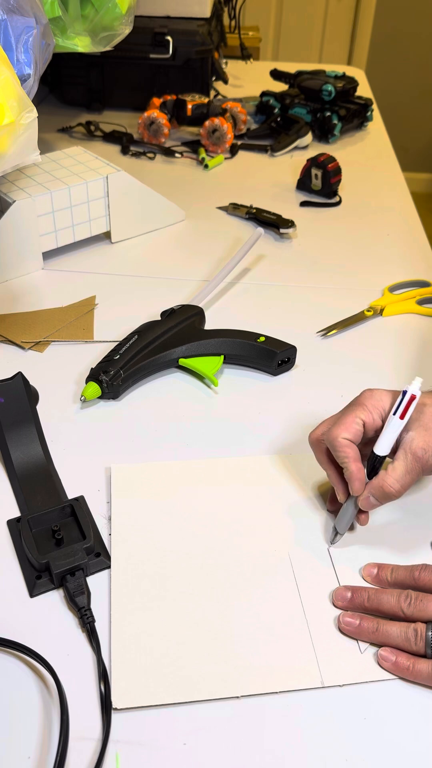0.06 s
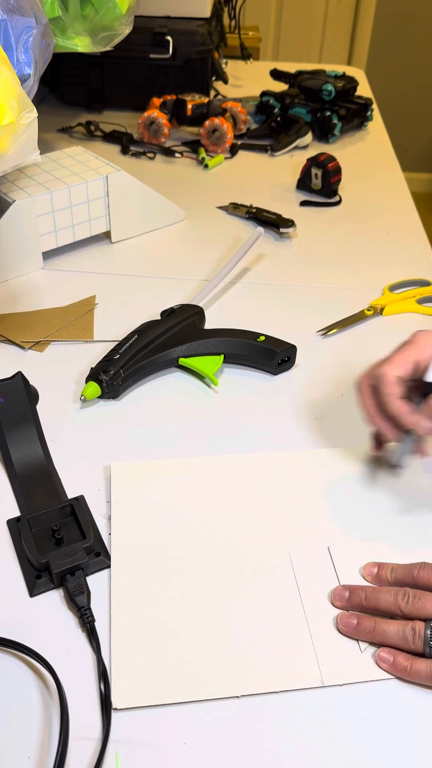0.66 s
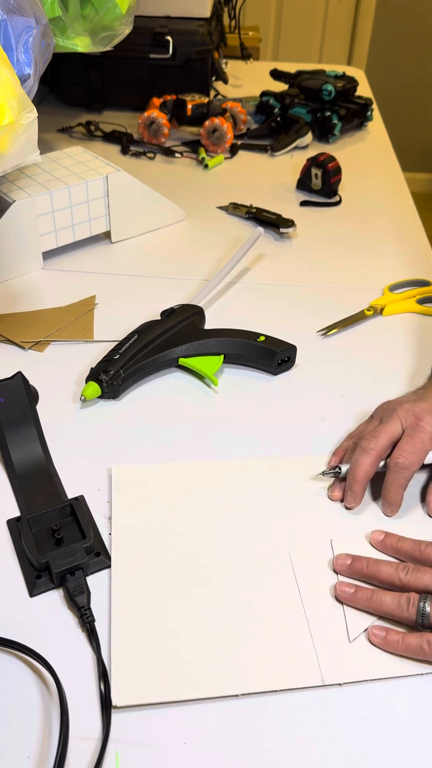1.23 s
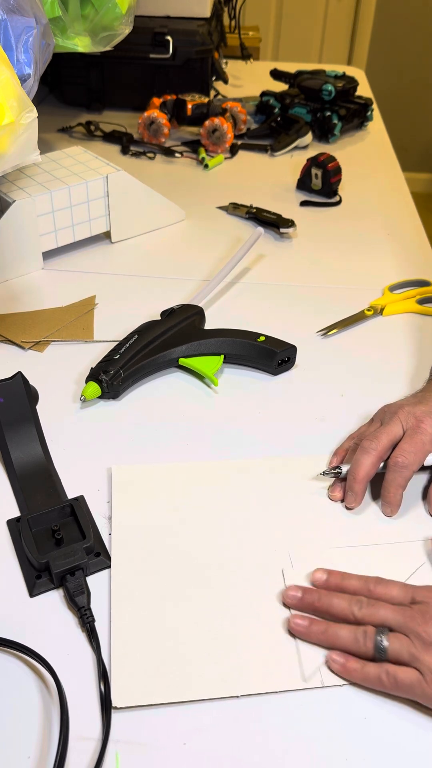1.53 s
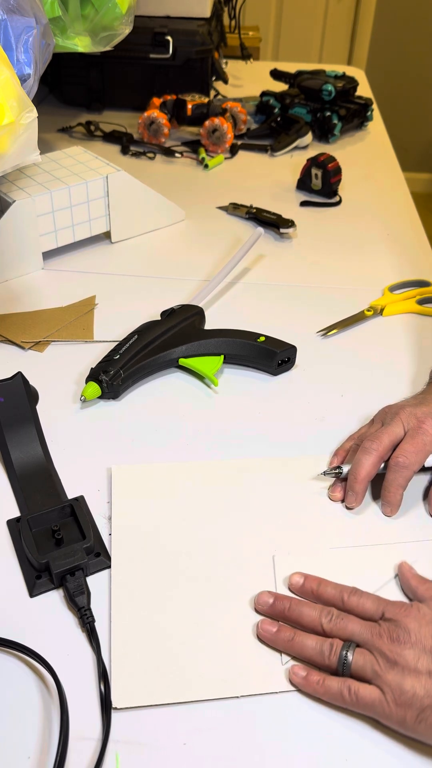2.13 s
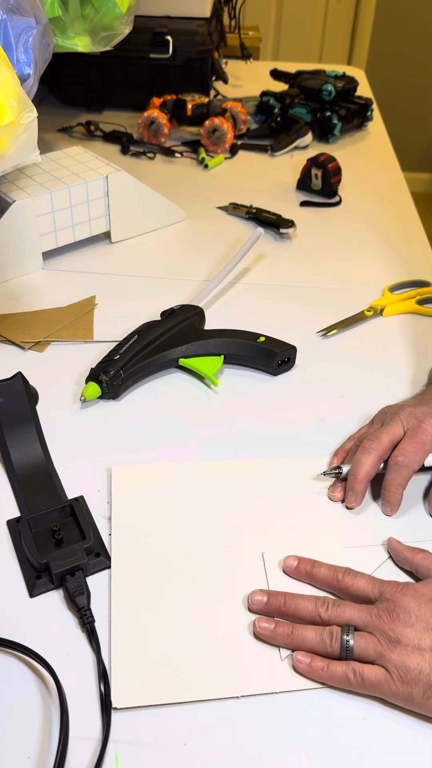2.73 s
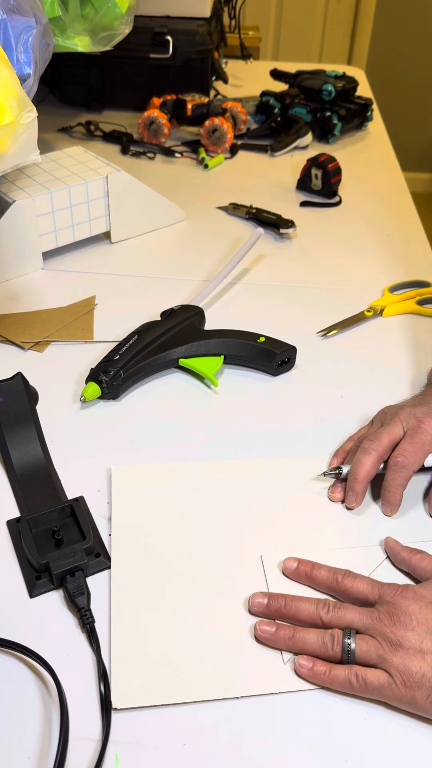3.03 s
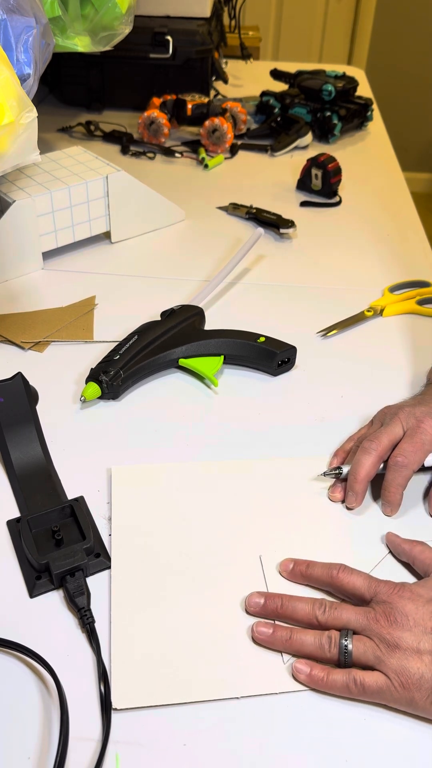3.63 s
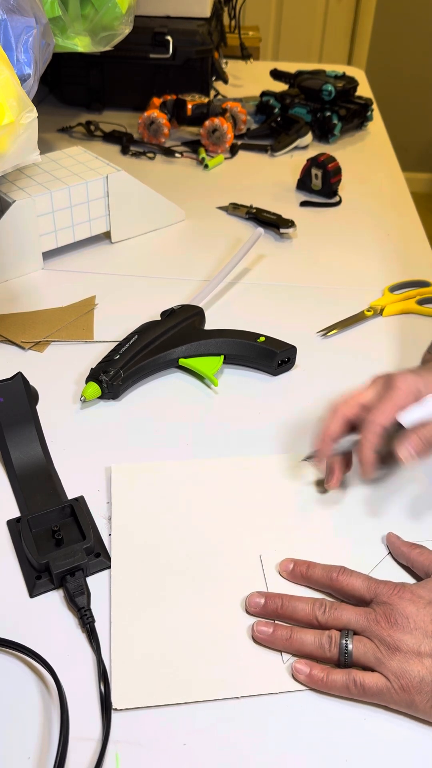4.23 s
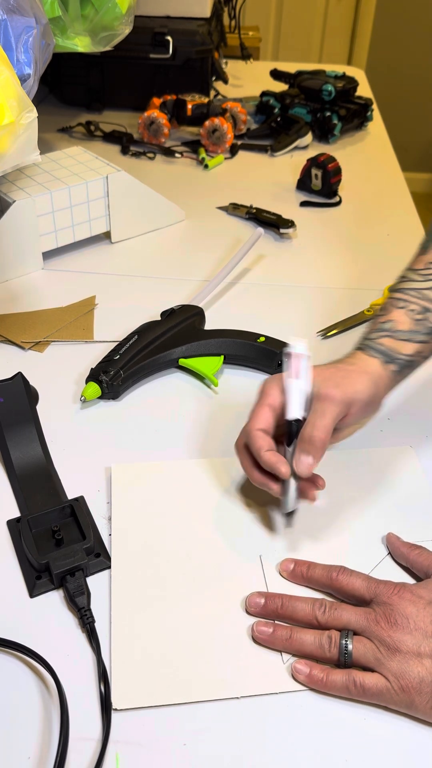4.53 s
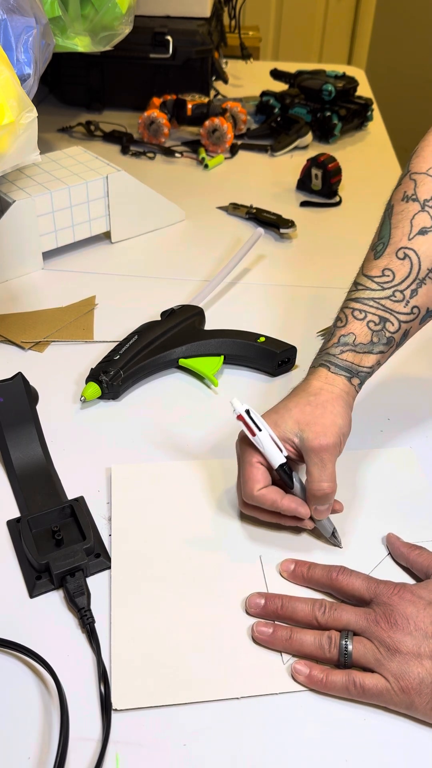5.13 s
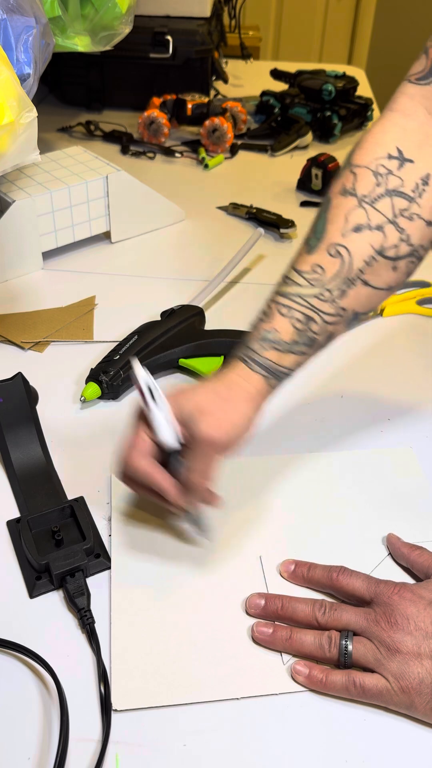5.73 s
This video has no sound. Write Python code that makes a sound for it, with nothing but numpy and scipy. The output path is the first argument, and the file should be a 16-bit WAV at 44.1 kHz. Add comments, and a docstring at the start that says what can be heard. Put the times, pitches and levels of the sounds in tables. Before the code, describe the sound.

A ballpoint pen scratches quickly across corrugated cardboard, making a low buzz that rises in pitch. The pen is set down with light clicks, and a hand slides and taps softly on the sheet. After a quieter stretch of small shifts, a second short, rising stroke ends in a sharp tick. The microphone is close, in a small room with a faint ventilation rumble.

```python
"""A ballpoint is drawn twice, fast, across corrugated cardboard on a table in a small room.
The ball scratches the paper and bumps over the flutes, so the board buzzes at a pitch that follows
the pen's speed. Between the strokes the pen is set down and a flat hand slides, taps and shifts on
the sheet. Ventilation rumbles faintly throughout; a phone hears it all through two close ports."""
import sys
import numpy as np
from scipy import signal
from scipy.fft import rfft, irfft
from scipy.io import wavfile

SR = 44100
rng = np.random.default_rng(int(sys.argv[2]) if len(sys.argv) > 2 else 0)


def master(y):
    """Save y as 16-bit WAV."""
    cut = np.clip(np.atleast_2d(y).T, -1, 1)
    pcm = np.round(cut * 32767)  # scale
    wavfile.write(sys.argv[1], SR, pcm.astype(np.int16))


N = 254452
T = np.arange(N) / SR
FFT_SIZE = 9 * 2 ** 15
FREQ = np.arange(FFT_SIZE // 2 + 1) * SR / FFT_SIZE + 1e-3


def undb(db):
    """Decibels to gain."""
    return 10 ** (np.asarray(db) / 20)


def unit(x):
    """Scale to rms 1."""
    return x / np.sqrt(np.mean(x ** 2))


def spectrum(points, modes=()):
    """Gain over FREQ: a curve through (f/Hz, level/dB) points, times resonances."""
    hz, db = np.transpose(points)
    curve_db = np.interp(np.log(FREQ), np.log(hz), db)
    modes_db = sum(lift_db / (1 + (2 * (FREQ - f_hz) / width_hz) ** 2)
                   for f_hz, width_hz, lift_db in modes)
    return undb(curve_db + modes_db)


def through(x, response):
    """Filter by a frequency response."""
    return irfft(rfft(x, FFT_SIZE) * response)[..., :N]


def causal(gain):
    """Minimum-phase response: rings only after the blow."""
    cepstrum = irfft(np.log(gain + 1e-9))
    cepstrum[1:FFT_SIZE // 2] *= 2
    cepstrum[FFT_SIZE // 2 + 1:] = 0
    return np.exp(rfft(cepstrum))


def wander(rate_hz):
    """Smooth random signal, rms 1."""
    return unit(through(rng.standard_normal(N), np.exp(-(FREQ / rate_hz) ** 2)))


def swell(peak_s, rise_s, fall_s):
    """Asymmetric bell envelope."""
    return np.exp(-.5 * ((T - peak_s) / np.where(T < peak_s, rise_s, fall_s)) ** 2)


def shelf(x, corner_hz, treble_gain):
    """High shelf with time-varying gain."""
    lows = through(x, 1 / (1 + (FREQ / corner_hz) ** 6))
    return lows + treble_gain * (x - lows)


def diffuse(mid, side, corner_hz=330):
    """Stereo sound from all around: long waves reach both ports alike."""
    side = through(side, FREQ ** 4 / (FREQ ** 4 + corner_hz ** 4))
    return np.array([mid + side, mid - side])


def fibres(colour, grit_db, patchy_db):
    """Paper fibres snapping past: dense uneven clicks, in rougher and smoother patches."""
    clicks = rng.standard_normal(N) * undb(grit_db * rng.standard_normal(N))
    patches = undb(patchy_db * wander(230))
    return unit(through(clicks * patches, causal(colour)))


# air spectrum: f/Hz, level/dB
AIR_SPECTRUM = [(20, -24), (40, 0.5), (70, 0), (110, 4), (160, -7), (220, -10.5), (320, -22), (500, -31.5),
                (800, -33.5), (1400, -37.5), (2200, -44.5), (4500, -50), (6000, -54.5), (8000, -85),
                (15000, -72)]
# room resonances: f/Hz, width/Hz, lift/dB
AIR_MODES = [(68.4, 21, 6.6), (98.9, 6.3, 9.5), (154, 5.2, 13), (490, 17, 3.5)]


def ventilation(rumble_db=-57, whine_hz=1472, whine_db=-94):
    """Steady rumble in the room's modes, with a faint whine."""
    mid, side = through(rng.standard_normal((2, N)), spectrum(AIR_SPECTRUM, AIR_MODES))
    whine = np.sin(2 * np.pi * whine_hz * T)
    return undb(rumble_db) * unit(diffuse(mid, side)) + undb(whine_db) * whine


# palm and finger rubs: peak t/s, rise/s, fall/s, rasp level/dB, hiss over rasp/dB, drag level/dB
HAND_RUBS = [(.05, 0.054, 0.13, -104, -9, -62), (0.668, 0.019, 0.019, -71.5, 3.5, -58),
             (0.736, 0.019, 0.05, -72, 4, -64), (0.826, 0.014, 0.042, -63.5, 17, -54),
             (0.964, 0.053, 0.047, -66.5, 19.5, -59), (1.09, 0.016, 0.027, -62, 13, -57),
             (1.209, 0.024, 0.031, -57.5, 8.5, -61), (1.313, 0.032, 0.035, -53.5, 18, -54.5),
             (1.476, 0.052, 0.059, -61, 17, -52.5), (1.585, 0.052, 0.024, -63.5, 13.5, -61),
             (1.77, 0.059, 0.062, -63.5, 9.5, -55.5), (1.92, 0.058, 0.022, -66.5, 24, -72),
             (2.03, 0.061, 0.11, -70.5, 14, -62), (2.12, 0.021, 0.022, -69, 11.5, -51),
             (2.194, 0.051, 0.062, -65.5, 16, -57.5), (2.34, 0.022, 0.025, -69.5, 10.5, -70),
             (2.41, 0.034, 0.021, -79, -16.5, -57), (2.609, 0.019, 0.025, -68, 3.5, -58),
             (2.66, 0.01, 0.016, -72, 3, -56), (2.747, 0.021, 0.028, -75.5, -5, -63),
             (2.848, 0.021, 0.021, -72.5, -0.5, -69.5), (3.02, 0.077, 0.048, -86, -8, -65),
             (3.155, 0.02, 0.016, -77, -15, -67), (3.39, .025, 0.036, -85, -6.5, -76.5),
             (3.549, 0.009, 0.035, -77.5, -10, -59.5), (4.142, .016, .02, -78.5, -5, -65.5),
             (4.2, 0.014, 0.016, -65, 4.5, -71.5), (4.417, 0.0076, 0.03, -67.5, 7, -88),
             (4.73, .018, 0.027, -75.5, -10, -59), (4.847, 0.021, 0.029, -78, -13.5, -65),
             (4.946, 0.024, 0.038, -79.5, -14, -68), (5.139, 0.021, 0.037, -67, -0.5, -63),
             (5.52, 0.012, 0.044, -85, -12, -55)]
# hiss, rasp and drag spectra as heard: f/Hz, level/dB
HISS_SPECTRUM = [(500, -34.5), (2500, -14.5), (4600, -8), (5600, -3.5), (8000, -2), (10000, 5), (12500, -7),
                 (15500, 4)]  # dips at 12.5 kHz; the dip is not the hand's
RASP_SPECTRUM = [(200, -25.5), (600, 3.5), (1000, 4.5), (1400, 4.5), (2000, 6), (2900, 8), (4500, 4),
                 (5800, -4), (7000, -26.5), (14000, -32)]
DRAG_SPECTRUM = [(30, -11), (70, 14.5), (130, 6.5), (220, -5.5), (320, -0.5), (480, -1.5), (750, -17.5),
                 (1300, -21), (4000, -48.5), (15000, -69.5)]
# sheet resonances under the hand: f/Hz, width/Hz, lift/dB
HAND_MODES = [(370, 50, 0), (490, 70, -0.5), (1030, 120, 4.5), (2800, 170, 2.5), (3650, 250, -0.5),
              (5500, 340, 3), (6325, 500, 1.5), (8700, 2100, 0)]


def hand(rest_rasp_db=-93.5, rest_drag_db=-78, drag_power=0.39):
    """Skin hisses on the liner, rasps its fibres and drags the sheet into a low rumble."""
    rest = undb(0.5 * wander(2.89))  # a resting hand is never quite still
    hiss, rasp, drag = 0, rest * undb(rest_rasp_db), rest * undb(rest_drag_db)
    for peak_s, rise_s, fall_s, rasp_db, bright_db, drag_db in HAND_RUBS:
        touch = swell(peak_s, rise_s, fall_s)
        hiss = np.hypot(hiss, touch * undb(rasp_db + bright_db))
        rasp = np.hypot(rasp, touch * undb(rasp_db))
        drag = np.hypot(drag, touch ** drag_power * undb(drag_db))  # outlasts the rasp
    return (hiss * fibres(spectrum(HISS_SPECTRUM, HAND_MODES), grit_db=3.3, patchy_db=1.5)
            + rasp * fibres(spectrum(RASP_SPECTRUM, HAND_MODES), grit_db=4.0, patchy_db=0.6)
            + drag * fibres(spectrum(DRAG_SPECTRUM, HAND_MODES), grit_db=3.0, patchy_db=3.5))


# pen motion, one list per stroke: t/s, flute rate/Hz, pressure/dB
PEN_MOTIONS = [
    [(.085, 23.9, -4), (.135, 40.9, 6), (.2, 57.2, 1.5), (.24, 74.5, 5), (.275, 119.6, 1), (.31, 119.2, -4),
     (.374, 146.2, 2.5), (.4, 147.7, 1)],
    [(5.48, 29.88, -3), (5.53, 51.6, -4), (5.57, 80.6, -4), (5.605, 113.2, 4), (5.632, 159.2, 1),
     (5.66, 218, -14.5)],
]
# strokes: lift-off t/s, scratch level/dB, buzz level/dB, bite rate/Hz, barrel lift/dB, bounce/0-1
PEN_STROKES = [(0.395, -42.5, -33, 61.9, -1.5, 0.04), (5.66, -41.5, -29.5, 89, 5, 0.19)]
# scratch and board spectra as heard: f/Hz, level/dB
SCRATCH_SPECTRUM = [(150, -13.5), (400, 8.5), (750, 8), (1050, 7), (1400, 0), (2000, 5), (3000, 6.5),
                    (4700, 1), (6000, 3.5), (9000, 7.5), (12500, 3), (15500, 6.5)]
BOARD_SPECTRUM = [(25, -11.5), (70, 4), (105, -3.5), (145, 4.5), (220, -4), (300, -10), (420, -8.5),
                  (700, -22.5), (1200, -27), (4000, -62.5), (15000, -85.5)]
# sheet resonances under the ball: f/Hz, width/Hz, lift/dB
BALL_MODES = [(338, 92, 14), (543, 190, 9.5), (1026, 330, 2.5), (1590, 260, 7.5), (1850, 50, -4),
              (3310, 180, 2), (4390, 77, 8)]
BARREL_HZ, BARREL_WIDTH_HZ = 2880, 380


def pen(landing_s=0.024, ref_rate_hz=153.7, flute_jitter=.02, sharpness=6, uneven_db=1.2,
        scratch_db_per_s=514, buzz_db_per_s=599, overtone_db_per_s=1204):
    """Each flute bumps the ball, which thumps the board and briefly scratches harder."""
    board = causal(spectrum(BOARD_SPECTRUM))
    out = 0
    for motion, stroke in zip(PEN_MOTIONS, PEN_STROKES):
        lift_s, scratch_db, buzz_db, bite_hz, barrel_db, bounce = stroke
        times_s, rates_hz, pressure_db = np.transpose(motion)
        rate_hz = np.interp(T, times_s, rates_hz)
        pressure = undb(np.interp(T, times_s, pressure_db))
        landed = np.clip((T - times_s[0]) / landing_s, 0, 1)
        lifted_s = np.maximum(T - lift_s, 0)
        phase = 2 * np.pi * np.cumsum(rate_hz * (1 + flute_jitter * wander(90))) / SR

        bite = 1 / (1 + (bite_hz / rate_hz) ** 4.17)  # a slow ball is quiet and dull
        colour = spectrum(SCRATCH_SPECTRUM, BALL_MODES + [(BARREL_HZ, BARREL_WIDTH_HZ, barrel_db)])
        scratch = fibres(colour, grit_db=5.0, patchy_db=0.1)
        scratch = shelf(scratch, corner_hz=4500, treble_gain=bite ** 0.42)
        scratch *= bite * pressure ** 0.52 * (1 + 0.11 * np.cos(phase))
        scratch *= undb(scratch_db - scratch_db_per_s * lifted_s)

        bumps = np.exp(sharpness * (np.cos(phase) - 1)) * undb(uneven_db * wander(160))
        bumps *= 1 + bounce * np.cos(phase / 2)  # lands harder on every second flute
        buzz = through(bumps - bumps.mean(), board)
        buzz = shelf(buzz, corner_hz=210, treble_gain=undb(-overtone_db_per_s * lifted_s))
        buzz /= np.std(buzz[(T > times_s[0]) & (T < lift_s)])
        buzz *= pressure * (rate_hz / ref_rate_hz) ** 2.52
        buzz *= undb(buzz_db - buzz_db_per_s * lifted_s)
        out += landed * (scratch - buzz)
    return out


# ball leaving paper ridges: t/s, half length/s, level/dB
BALL_FLICKS = [(0.25, 0.0022, -43), (0.37, 0.0035, -46), (5.6568, 0.0016, -29)]


def flicks(highpass_hz=2000, barrel_db=6):
    """The ball snaps off a ridge with a short, bright spit."""
    colour = spectrum(SCRATCH_SPECTRUM, [(BARREL_HZ, BARREL_WIDTH_HZ, barrel_db)])
    colour *= FREQ / (FREQ + highpass_hz)
    envelope = sum(undb(db) * swell(peak_s, half_s, half_s) for peak_s, half_s, db in BALL_FLICKS)
    return envelope * unit(through(rng.standard_normal(N), colour))


# pen, finger and palm knocks: t/s, relative click/dB, relative thump/dB, contact cutoff/Hz, ring/0-1
KNOCKS = [(0.592, -73, -54, 500, 0), (0.646, -82.5, -43.5, 96, 0), (0.687, -75, -53, 695, 0),
          (0.8159, -47.5, -51.5, 4430, 0.73), (0.826, -66.5, -44.5, 7000, .5), (0.855, -70, -38, 97, 0),
          (1.073, -56, -64.5, 11500, 0.2), (1.1825, -42, -45, 3440, 0.9), (1.196, -60, -46.5, 4000, 0.9),
          (1.216, -62, -59, 3000, 1), (1.474, -63.5, -44, 261, 0), (1.521, -60.5, -47.5, 217, 0),
          (1.9523, -44, -47, 3140, .3), (2.532, -57, -45.5, 750, 0.28), (4.1837, -65, -58.5, 4500, 0.3),
          (4.4046, -56, -94, 3800, 0.34), (5.125, -63, -49.5, 5000, 0.3)]
# click spectrum: f/Hz, level/dB
CLICK_SPECTRUM = [(100, -15), (500, -14), (1000, 0), (1500, -3), (2200, 3), (3000, 0.5), (5000, 3.5),
                  (9000, 3.5), (15000, -19)]
# resonances of the sheet (click) and table (thump): f/Hz, width/Hz, lift/dB
CLICK_MODES = [(1026, 150, 15), (2170, 130, 13), (2990, 110, 5), (3642, 200, 3), (5340, 440, 4)]
THUMP_MODES = [(70.5, 35, 1.5), (112, 39, 8)]


def knocks(click_s=0.0084, thump_s=0.019, rattle=0.04, click_gain_db=-20, thump_gain_db=9,
           delay_at_100hz_s=.012):
    """A click and a thump on the sheet; bending waves carry the treble ahead of the bass."""
    t = T[:SR // 5]
    free, damped, thumps = np.zeros((3, N))
    for start_s, click_db, thump_db, cutoff_hz, ring in KNOCKS:
        span = slice(int(start_s * SR), int(start_s * SR) + len(t))
        push = rattle * rng.standard_normal((2, len(t))) * np.exp(-t / [[click_s], [thump_s]])
        push[:, 0] = 1  # impulse ahead of the rattle
        contact = signal.butter(2, cutoff_hz, fs=SR, output="sos")  # soft skin passes only lows
        click = undb(click_db + click_gain_db) * unit(signal.sosfilt(contact, push[0]))
        free[span] += ring * click
        damped[span] += (1 - ring) * click
        thumps[span] += undb(thump_db + thump_gain_db) * signal.sosfilt(contact, unit(push[1]))
    sheet = (through(free, causal(spectrum(CLICK_SPECTRUM, CLICK_MODES)))
             + through(damped, causal(spectrum(CLICK_SPECTRUM)))
             + through(thumps, causal(spectrum(BOARD_SPECTRUM, THUMP_MODES))))
    dispersion = np.exp(-4j * np.pi * delay_at_100hz_s * np.sqrt(100 * FREQ))  # delay ~ 1/sqrt(f)
    return through(sheet, dispersion)


def reverb(x, t60_s=0.53, treble_t60_s=.12, walls_db=-13, near_db=-9, near_decay_s=0.016):
    """The table and things on it answer briefly, the walls for longer; treble dies first."""
    t = T[:SR // 2]
    noise = rng.standard_normal((2, len(t))) * (t > .0015)

    def tail(decay_s):
        """Mid and side response of echoes falling by 1/e in decay_s."""
        return rfft(unit(noise * np.exp(-t / decay_s)) / np.sqrt(len(t)), FFT_SIZE)

    lows = 1 / (1 + (FREQ / 6000) ** 10)
    walls = tail(t60_s / np.log(1000)) * lows + tail(treble_t60_s / np.log(1000)) * (1 - lows)
    walls *= undb(3 / (1 + ((FREQ - 4200) / 1300) ** 2))  # hard walls are liveliest here
    echoes = undb(walls_db) * walls + undb(near_db) * tail(near_decay_s)
    # a small sheet radiates little bass; the echoes are dull, rolled off above 11 kHz
    band = FREQ / np.hypot(FREQ, 220) / (1 + (FREQ / 11000) ** 4)
    return diffuse(*through(x, band * echoes))


# phase lead of the left port: f/Hz, phase/rad
PORT_PHASE = [(0, 0), (6800, 0), (10000, -2), (12000, -3.1), (14000, -3.4), (16000, -4.7)]


def scene(sheet_db=-1):
    """Sheet, echoes and ventilation at two close ports; the direct treble arrives out of phase."""
    air = ventilation()
    sheet = undb(sheet_db) * (hand() + pen() + flicks() + knocks())
    half_lead = np.exp(.5j * np.interp(FREQ, *np.transpose(PORT_PHASE)))
    direct = through(sheet, np.array([half_lead, 1 / half_lead]))
    return air + direct + reverb(sheet)


def record(dry):
    """The phone's steep low-pass."""
    cutoff_hz = 15900
    return signal.sosfilt(signal.ellip(10, .2, 80, cutoff_hz, fs=SR, output="sos"), dry)


dry = scene()
out = record(dry)
master(out)
```